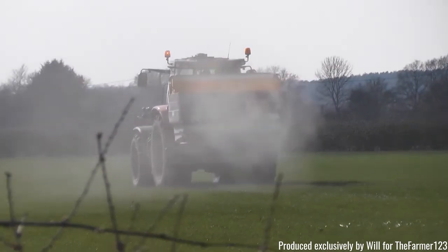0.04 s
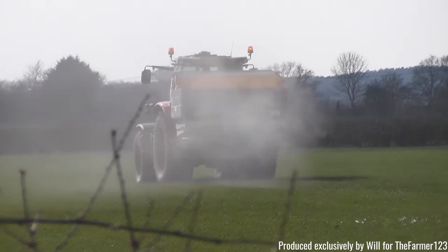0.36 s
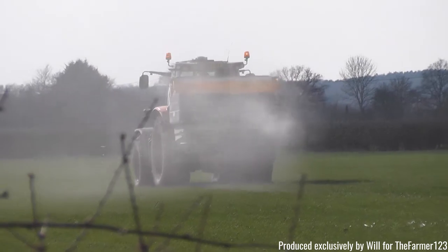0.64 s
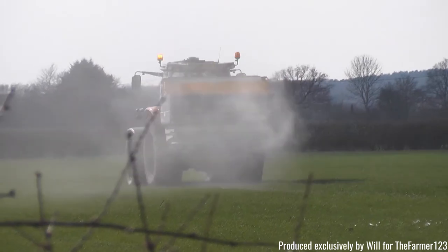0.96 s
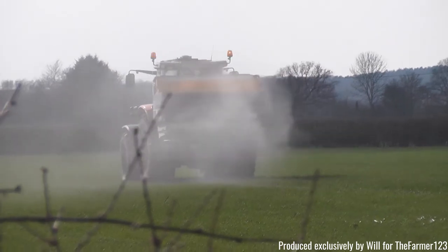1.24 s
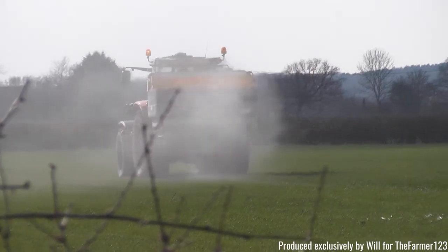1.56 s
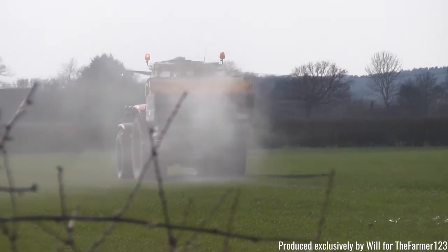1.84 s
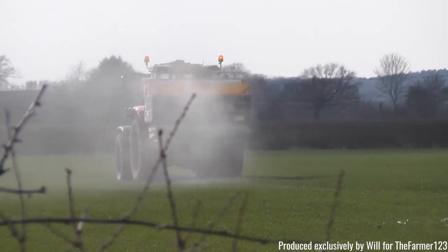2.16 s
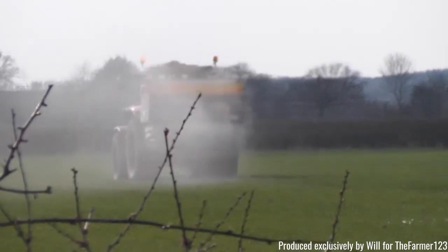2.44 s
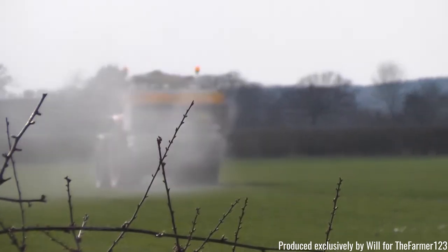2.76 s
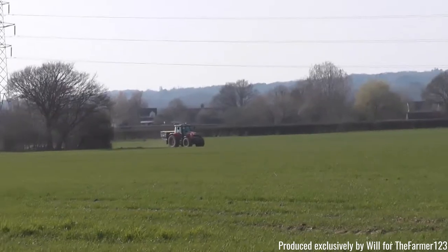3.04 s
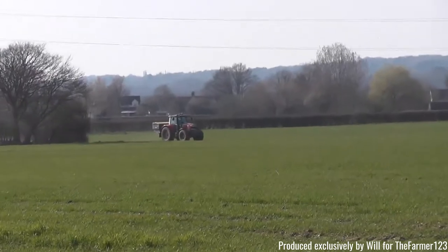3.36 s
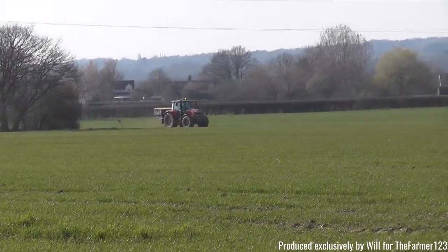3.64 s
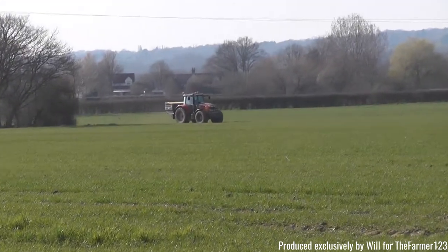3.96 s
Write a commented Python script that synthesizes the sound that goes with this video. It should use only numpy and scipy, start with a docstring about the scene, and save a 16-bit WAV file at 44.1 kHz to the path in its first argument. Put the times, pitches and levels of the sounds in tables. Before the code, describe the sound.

A tractor drones in an open field under the pulsing hiss and rattle of fertiliser pellets flung from its spreader. It fades to a quiet, distant hum with a thin whine, while wind bumps and handling clicks hit the microphone.

```python
"""Tractor spreading fertiliser

A diesel drones in an open field under the pulsing hiss of pellets flung off spinning discs, both
periodic with one crankshaft. They fade into the same tractor far away, a dull hum with a thin whine.
Wind bumps the microphone, a small bird whistles, and a camera's housing clicks and thumps in the hand."""
import sys
import numpy as np
from scipy import signal
from scipy.fft import rfft, irfft
from scipy.io import wavfile

SR = 44100
rng = np.random.default_rng(int(sys.argv[2]) if len(sys.argv) > 2 else 0)


def digitize_waveform(pressure):
    """Quantize a signal to 16-bit integers and store it at the path in sys.argv[1].

    Rows of a 2-D input are taken as channels; values are limited to [-1, 1].
    """
    field = np.atleast_2d(pressure).T
    bounded = np.clip(field, -1, 1)
    quanta = np.round(bounded * 32767).astype(np.int16)
    wavfile.write(sys.argv[1], SR, quanta)


N = 176400
T = np.arange(N) / SR
HZ = np.fft.rfftfreq(N, 1 / SR)

# envelope of the near engine and the breeze: time_s, gain_db
ENGINE_ENVELOPE = [(0, 1.5), (1.0, -.5), (1.35, 1.5), (2.0, -1), (2.35, -5), (2.65, -11)]


def engine(turns):
    """Rotation radiates tones at multiples of the crank speed; each firing modulates a broadband roar."""
    # crank harmonics: order, relative_db
    crank_orders = [(4, -5.5), (5, -11.5), (6, 3.5), (8, -9), (9, -7), (10, -1.5), (11, -4), (13, -6),
                    (14, -14), (16, -10.5), (18, -11.5)]
    # gear tones of the drive: crank_multiple, relative_db
    gear_tones = [(5.38, -35.5), (6.6, -39.5), (21.9, -49.5), (23.36, -48.5), (30.15, -46)]
    # exhaust and tyre roar: frequency_hz, relative_db
    roar_spectrum = [(20, -14), (50, -10), (150, 1), (300, -2), (450, -8.5), (720, -17.5), (1200, -14.5),
                     (4000, -29.5)]

    def tone(order):
        """Phase modulation grows with order, so higher tones are less steady."""
        wobble_turns = 0.0044 * drift(5.3)
        waver = amp(2.2 * drift(2.9))
        return waver * np.sin(order * 2 * np.pi * (turns + wobble_turns) + rng.uniform(0, 2 * np.pi))

    drone = amp(-28) * unit(sum(amp(db) * tone(order) for order, db in crank_orders))
    gears = sum(amp(db) * unit(tone(multiple)) for multiple, db in gear_tones)
    roar = amp(-26.5) * unit(noise(roar_spectrum) * (1 + 0.13 * pulses(turns)))
    pan = amp([[-1], [1]])
    return (drone + gears + roar) * amp(curve(ENGINE_ENVELOPE)) * pan


def spreader(turns):
    """Dense impacts merge into noise and ring the discs; the vanes' uneven throws modulate both."""
    # pellets on steel: frequency_hz, relative_db
    rattle_spectrum = [(900, -25.5), (1750, -14.5), (1945, -5.5), (2100, -9.5), (2550, -8.5), (2880, -2.5),
                       (3150, -4.5), (3600, -1.5), (4600, -4.5), (5500, -9), (6200, -16), (9000, -56)]
    # their envelope: time_s, level_db
    rattle_envelope = [(0, -20.5), (.85, -19.5), (1.1, -20), (1.5, -20.5), (1.95, -18.5), (2.15, -20.5),
                       (2.4, -26.5), (2.75, -39)]
    # finer spray of pellets: frequency_hz, relative_db
    spray_spectrum = [(4000, -31), (5400, 0), (6100, -4.5), (6900, 4), (7300, -2.5), (7700, 1), (8500, -4),
                      (10000, -11), (12000, -20.5), (15500, -41)]
    # its envelope: time_s, level_db
    spray_envelope = [(0, -30), (.4, -27), (.65, -23), (1.05, -31.5), (1.6, -29), (1.95, -24.5),
                      (2.2, -30.5), (2.45, -38.5), (2.75, -48.5)]
    # ringing of the struck discs: time_s, level_db
    ring_envelope = [(0, -40), (.7, -28), (1.1, -24), (1.45, -31), (1.95, -18.5), (2.75, -51)]
    throws = 1 + 0.12 * pulses(turns) + 0.052 * np.sin(2 * np.pi * turns)
    flutter_db = 0.66 * drift(44)
    flow = unit(throws * amp(flutter_db))
    ring = band(hz=4545, half_width_hz=380) * amp(curve(ring_envelope))
    rattle = noise(rattle_spectrum) * amp(curve(rattle_envelope))
    spray = noise(spray_spectrum) * amp(curve(spray_envelope))
    return flow * (rattle + spray + ring)


def far_tractor():
    """Low-weighted noise makes a distant hum, narrowband noise a whirr, a modulated tone a whine."""
    # far tractor and open air: frequency_hz, relative_db
    hum_spectrum = [(25, 0), (80, 1), (160, 2.5), (350, -13), (650, -18), (850, -12), (1080, -11),
                    (1400, -12.5), (1680, -12), (2200, -22), (3600, -28), (5500, -38), (12000, -47)]
    # their envelope: time_s, level_db
    hum_envelope = [(2.0, -58), (2.4, -35.5), (2.8, -30), (3.1, -29), (3.55, -30.5), (4, -27)]
    # wandering whine: time_s, pitch_hz, level_db
    whine_path = [(2.7, 1638, -65), (2.95, 1674, -44), (3.06, 1650, -38), (3.14, 1733, -49),
                  (3.23, 1690, -38), (3.4, 1667, -39.5), (3.68, 1660, -45.5), (4, 1536, -44)]
    pitch_hz = curve(whine_path) * (1 + .01 * drift(39))
    tone = np.sin(2 * np.pi * np.cumsum(pitch_hz) / SR)
    whine = unit(tone * amp(2 * drift(12))) * amp(curve(whine_path, column=2))
    whirr = band(hz=1085, half_width_hz=96) * swell(peak_s=2.87, width_s=0.32, db=-39.5)
    hum = noise(hum_spectrum, width=0.68) * amp(curve(hum_envelope) + 0.58 * drift(8.9))
    return whine + whirr + hum


def low_bumps():
    """Low-frequency noise bursts: wind gusts, and at 3.649 s the dull thump of a knock on the housing."""
    # colour of the bumps: frequency_hz, relative_db
    bump_spectrum = [(15, -30), (70, -0.5), (115, -6.5), (180, -16), (900, -65)]
    # low bumps: peak_s, width_s, level_db
    bumps = [(2.36, 0.14, -35.5), (2.7, 0.04, -27.5), (3.275, 0.034, -18.5), (3.318, 0.0059, -16.5),
             (3.397, 0.009, -18), (3.595, 0.03, -29), (3.649, 0.009, -26.5), (3.93, 0.022, -21.5)]
    return noise(bump_spectrum, width=0.085) * sum(swell(*bump) for bump in bumps)


def click(db, centre_hz, spread_octaves, decay_s):
    """A brief crunch of contacts excites the modes of the plastic housing."""
    # housing resonances: frequency_hz, bandwidth_hz, gain_db
    modes = [(560, 290, 8), (1780, 1200, -3), (3020, 320, 2.5), (3980, 650, -6), (5380, 280, 4.5),
             (7050, 3500, -9.5)]
    rise_s, hold_s, tail_s = 0.00093, 0.001, 0.024
    size = SR // 10
    t, hz = T[:size], abs(np.fft.fftfreq(size, 1 / SR)) + 1
    fall = np.exp(-np.maximum(t - hold_s, 0) / decay_s) + amp(-26) * np.exp(-t / tail_s)
    force = np.minimum(t / rise_s, 1) * fall
    body = np.sqrt(sum(amp(gain) ** 2 / (1 + (2 * (hz - f) / width) ** 2) for f, width, gain in modes))
    colour = body / (1 + np.square(np.log2(hz / centre_hz) / spread_octaves) ** 2)
    contacts = np.fft.fft(force * rng.standard_normal(size))
    contacts /= np.sqrt(abs(contacts))  # flattened, so every click reaches all modes
    minimum_phase_filter = np.exp(signal.hilbert(np.log(colour)).conj())
    ring = np.fft.ifft(contacts * minimum_phase_filter).real[:size // 2]
    return amp(db) * ring * np.linalg.norm(force) / np.linalg.norm(ring)


def handling():
    """Impact and friction: the housing clicks, squeaks once and scrapes under the fingers."""
    # fingers on plastic: peak_s, width_s, level_db
    scrapes = [(3.61, .012, -38), (3.893, .012, -49)]
    # housing clicks: start_s, level_db, centre_hz, spread_octaves, decay_s
    clicks = [(3.177, -13.5, 2450, 1.35, 0.003), (3.609, -15, 7020, 1.15, 0.0033),
              (3.6459, -20.5, 4400, 1.0, 0.0026), (3.648, -16.5, 1890, 2.3, 0.0039),
              (3.7836, -37, 3770, 0.79, 0.0037)]
    mid = band(hz=5300, half_width_hz=1900) * sum(swell(*scrape) for scrape in scrapes)
    side = np.zeros(N)  # each microphone port hears its own version of a click
    for start_s, *shape in clicks:
        add(mid, start_s, click(*shape))
        add(side, start_s, click(*shape))
    squeak = chirp(length_s=.012, from_hz=3200, to_hz=3520, db=-23.5, waver=.03)
    add(mid, 3.597, squeak)
    return mid + amp(-11.5) * np.array([side, -side])


def breeze():
    """Light air pushes the two microphone ports in antiphase, fading with the near engine."""
    push = band(hz=60, half_width_hz=62) * amp(-34 + curve(ENGINE_ENVELOPE))
    return np.array([push, -push])


def bird():
    """Multipath echoes smear thin, faint whistles as they cross the field."""
    # whistles: start_s, length_s, from_hz, to_hz, level_db
    whistles = [(3.28, .12, 7800, 8480, -61), (3.42, .13, 8200, 8520, -62)]
    echo_decay_s = .04
    direct = np.zeros(N)
    for start_s, *shape in whistles:
        add(direct, start_s, chirp(*shape, waver=.008))
    echoes = rng.standard_normal(N) * np.exp(-T / echo_decay_s)
    return direct + .5 * signal.fftconvolve(direct, echoes / np.linalg.norm(echoes))[:N]


def pulses(turns, rolloff=0.63):
    """Four harmonics sum to two pushes per turn, quick to rise and slower to fall."""
    return unit(sum(rolloff ** k * np.sin(2 * np.pi * k * 2 * turns) for k in range(1, 5)))


def chirp(length_s, from_hz, to_hz, db, waver):
    """Frequency modulation: a short, unsteady tone whose glide levels off."""
    progress = np.arange(0, length_s, 1 / SR) / length_s
    glide_hz = to_hz + (from_hz - to_hz) * (1 - progress) ** 2
    pitch_hz = glide_hz * (1 + waver * drift(150)[:len(progress)])
    return amp(db) * np.sqrt(np.sin(np.pi * progress)) * np.sin(2 * np.pi * np.cumsum(pitch_hz) / SR)


def noise(points, width=1):
    """Partly coherent stereo noise of a given spectrum, rolling off above the last point."""
    # left-right likeness at full width: frequency_hz, coherence
    likeness = [(50, 1), (160, 0.78), (1500, .92), (3600, 1), (5000, .9995)]
    mid, side = rfft(rng.standard_normal((2, N)))
    coherence = np.clip(1 - width * (1 - spectrum(likeness)), 0, 1)
    mid, side = mid * np.sqrt(1 + coherence), side * np.sqrt(1 - coherence)
    colour = amp(spectrum(points)) / np.maximum(HZ / points[-1][0], 1) ** 2
    return unit(irfft(np.array([mid + side, mid - side]) * colour, N))


def band(hz, half_width_hz):
    """Noise filtered by one resonance."""
    return unit(irfft(rfft(rng.standard_normal(N)) / (1 + ((HZ - hz) / half_width_hz) ** 2), N))


def drift(cutoff_hz):
    """Low-passed noise as random motion."""
    return unit(irfft(rfft(rng.standard_normal(N)) / (1 + (HZ / cutoff_hz) ** 4), N))


def swell(peak_s, width_s, db):
    """A Gaussian rise and fall."""
    return amp(db) * np.exp(-.5 * ((T - peak_s) / width_s) ** 2)


def curve(points, column=1):
    """Linear interpolation over time."""
    rows = np.array(points)
    return np.interp(T, rows[:, 0], rows[:, column])


def spectrum(points):
    """Interpolation over log frequency."""
    hz, value = np.transpose(points)
    return np.interp(np.log(HZ + 1), np.log(hz), value)


def amp(db):
    """Decibels to amplitude ratio."""
    return 10 ** (np.asarray(db) / 20)


def unit(x):
    """Normalisation to rms 1."""
    return x / np.sqrt(np.mean(x ** 2) + 1e-20)


def add(mix, start_s, sound):
    """Superposes a sound on the mix."""
    part = mix[round(start_s * SR):][:len(sound)]
    part += sound[:len(part)]


def scene():
    """Superposition: engine and spreader, locked to one crankshaft, fade to leave the open field."""
    # crankshaft speed: time_s, rotation_hz
    crank_speed = [(0, 27.48), (.3, 27.87), (1.3, 27.91), (2.0, 27.73)]
    near_end_s, near_fade_s = 2.93, 0.16
    turns = np.cumsum(curve(crank_speed) * (1 + 0.0019 * drift(8.2))) / SR
    fade = np.clip((near_end_s - T) / near_fade_s, 0, 1)
    near = (engine(turns) + spreader(turns) + breeze()) * fade
    microphone_hiss = amp(-62.5) * rng.standard_normal((2, N))
    return near + far_tractor() + low_bumps() + handling() + bird() + microphone_hiss


def record(dry):
    """Band limiting: filters remove infrasound and the highest treble."""
    low_cut = signal.butter(2, 20, "highpass", fs=SR, output="sos")
    high_cut = signal.firwin(511, 15900, window=("kaiser", 9), fs=SR)
    return signal.oaconvolve(signal.sosfilt(low_cut, dry), high_cut[None], "same")


dry = scene()
out = record(dry)
digitize_waveform(out)
```